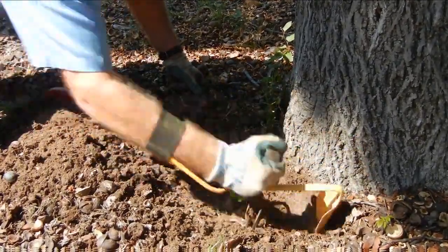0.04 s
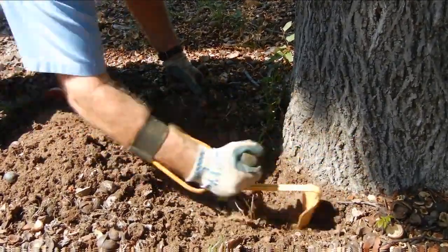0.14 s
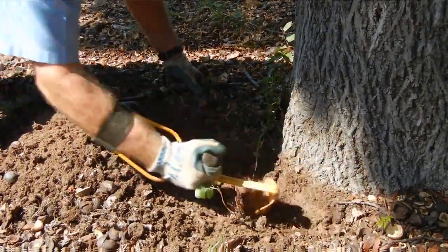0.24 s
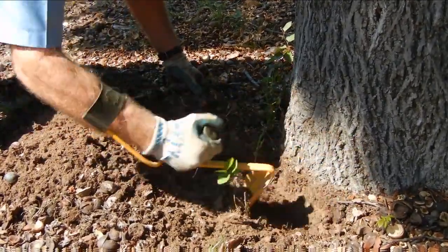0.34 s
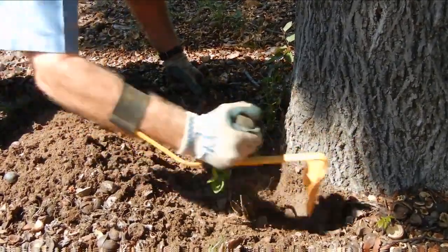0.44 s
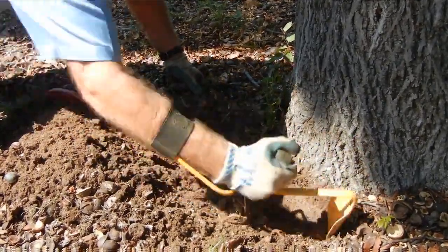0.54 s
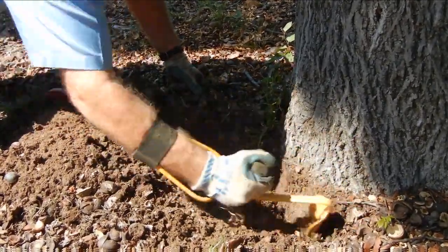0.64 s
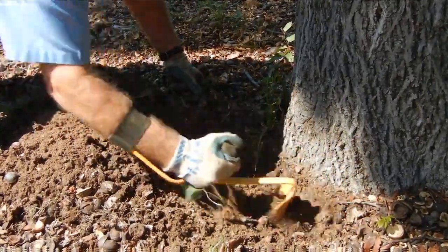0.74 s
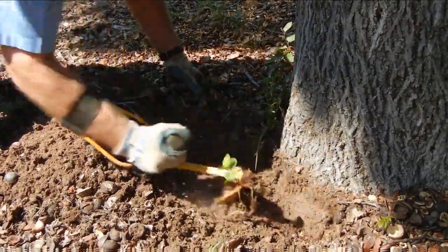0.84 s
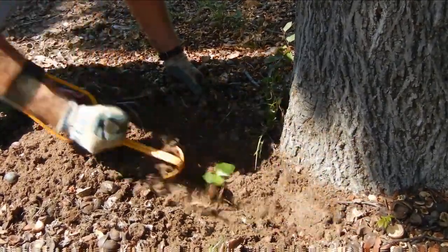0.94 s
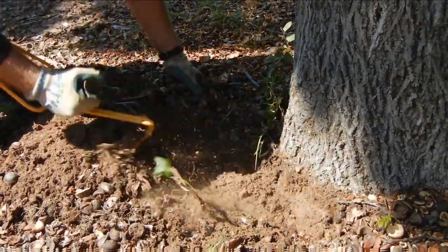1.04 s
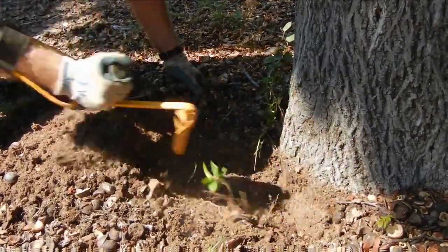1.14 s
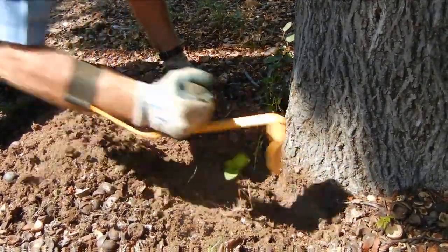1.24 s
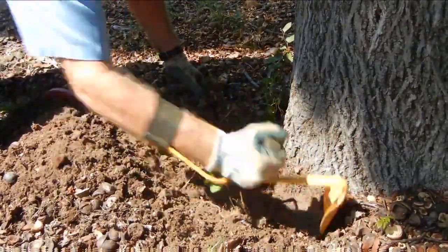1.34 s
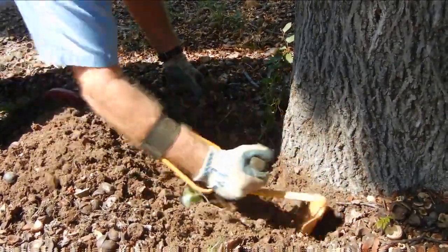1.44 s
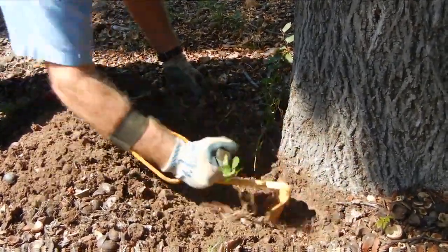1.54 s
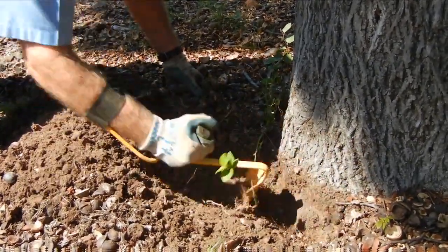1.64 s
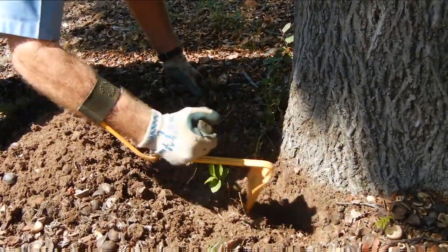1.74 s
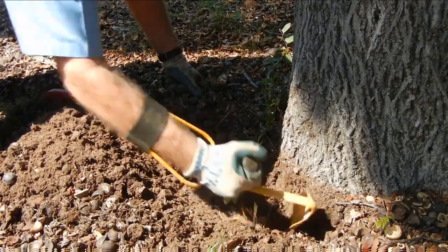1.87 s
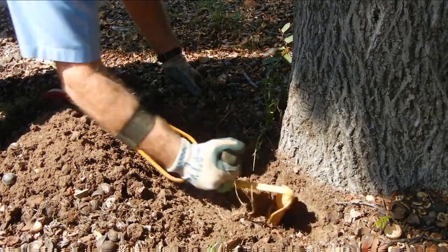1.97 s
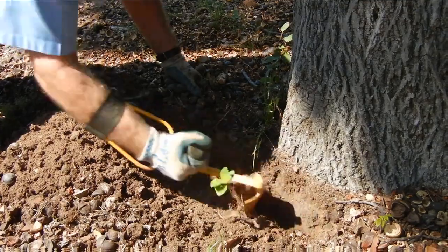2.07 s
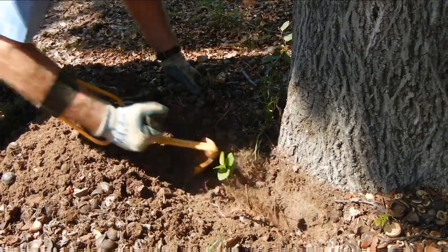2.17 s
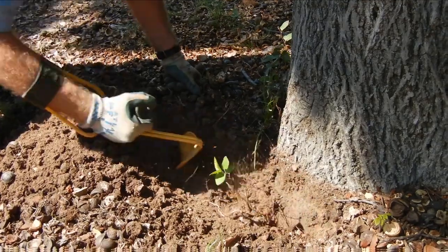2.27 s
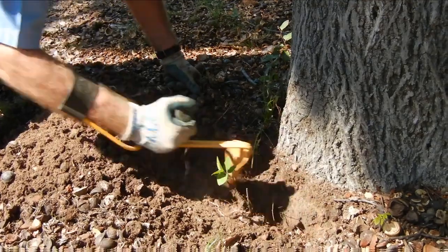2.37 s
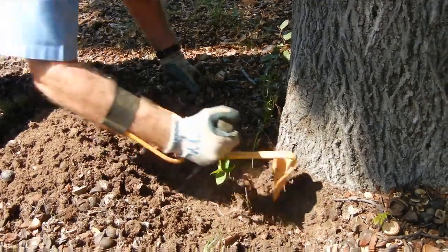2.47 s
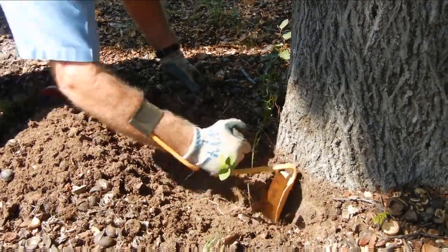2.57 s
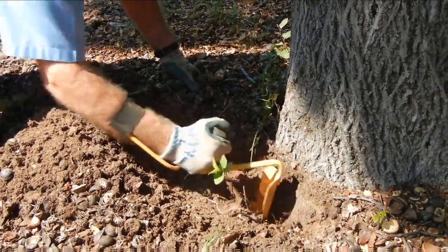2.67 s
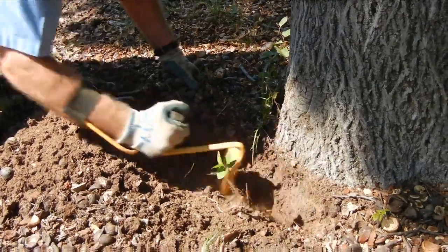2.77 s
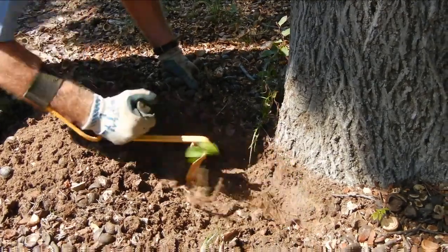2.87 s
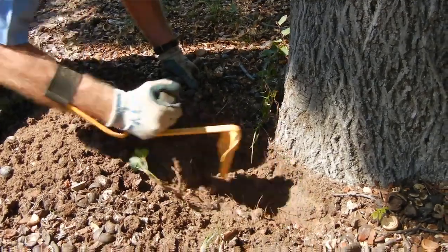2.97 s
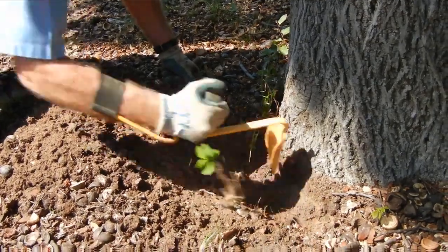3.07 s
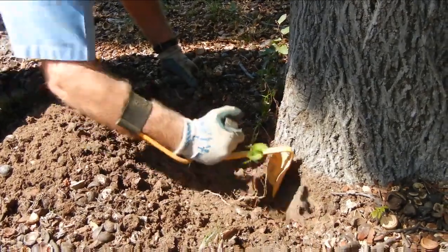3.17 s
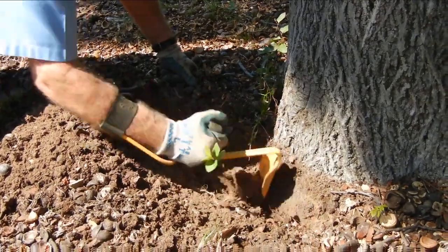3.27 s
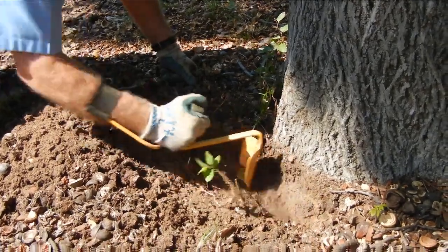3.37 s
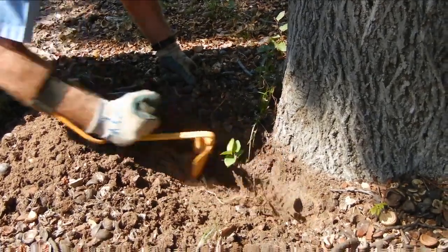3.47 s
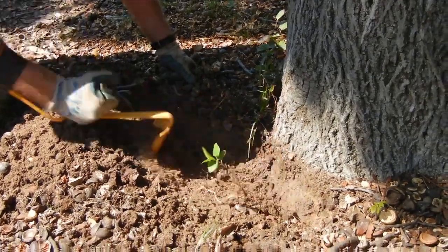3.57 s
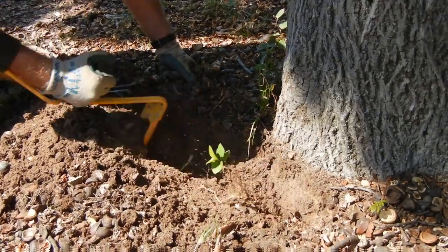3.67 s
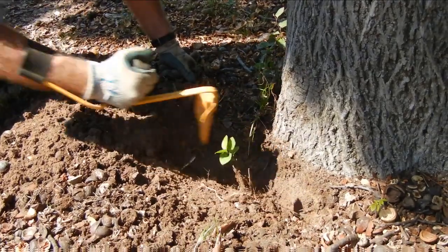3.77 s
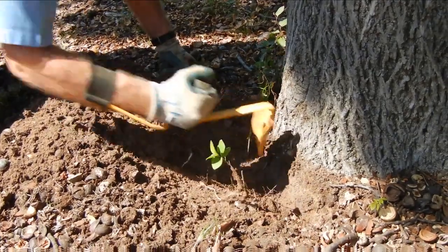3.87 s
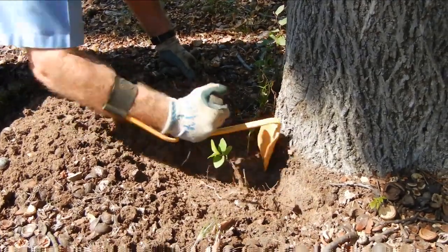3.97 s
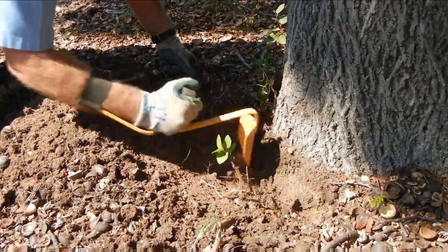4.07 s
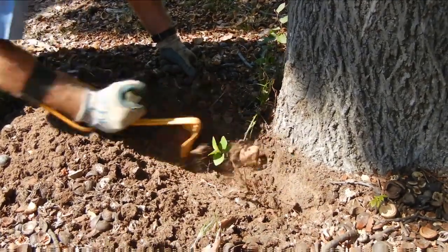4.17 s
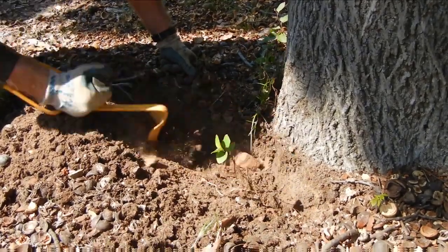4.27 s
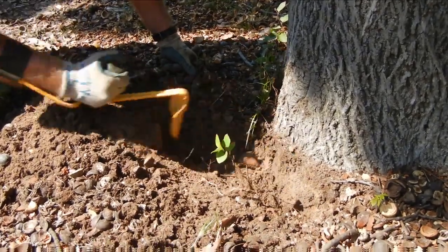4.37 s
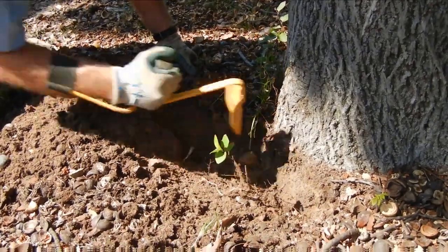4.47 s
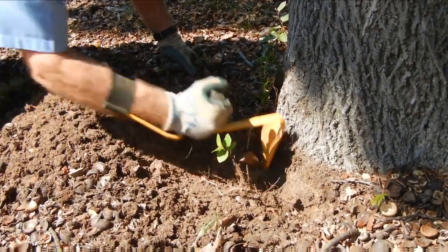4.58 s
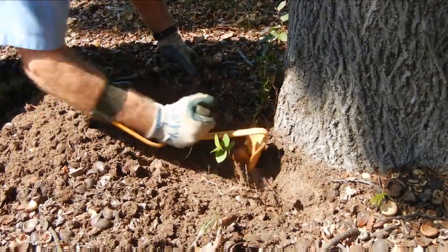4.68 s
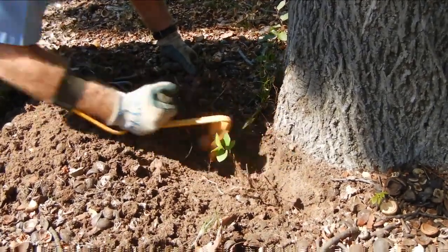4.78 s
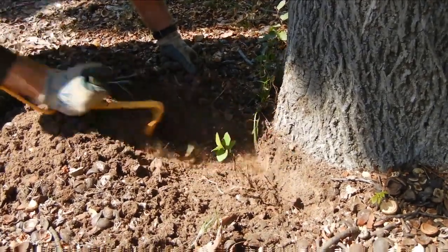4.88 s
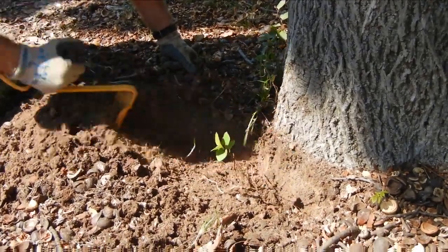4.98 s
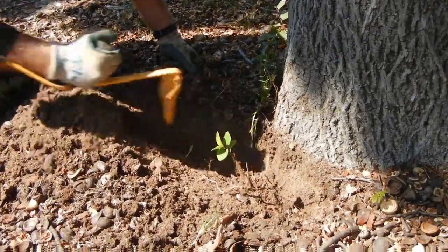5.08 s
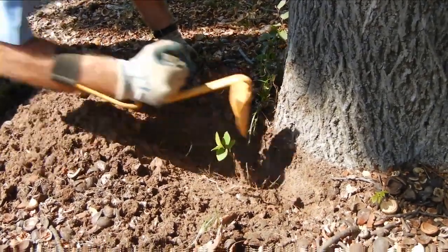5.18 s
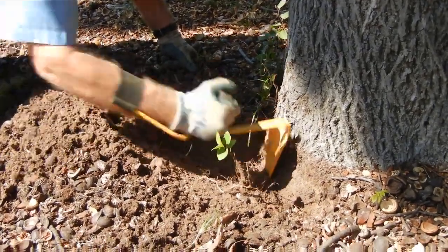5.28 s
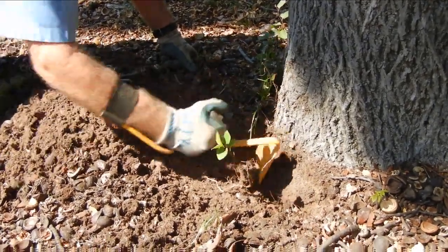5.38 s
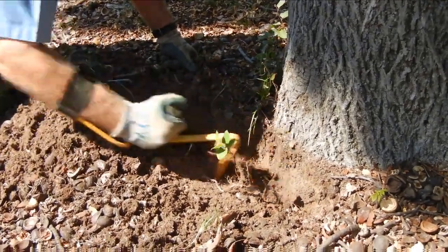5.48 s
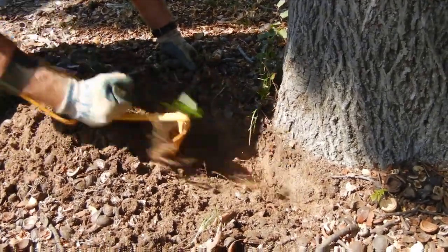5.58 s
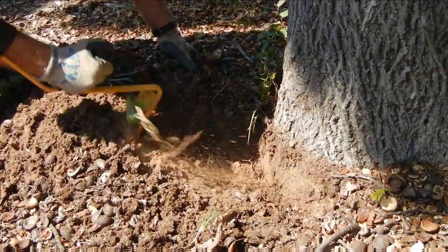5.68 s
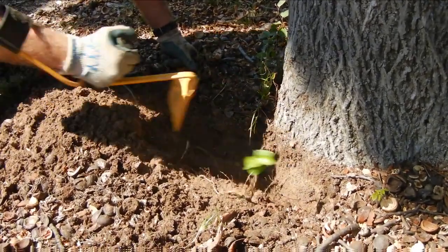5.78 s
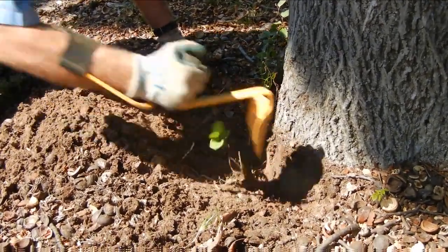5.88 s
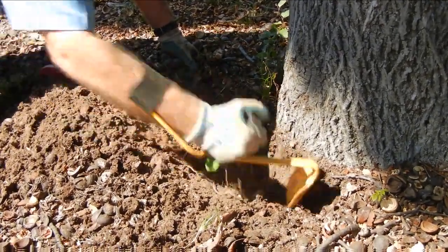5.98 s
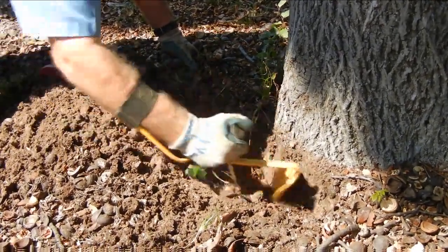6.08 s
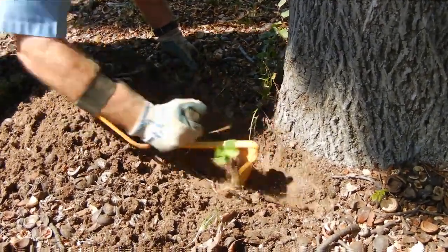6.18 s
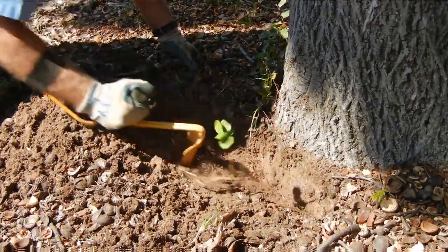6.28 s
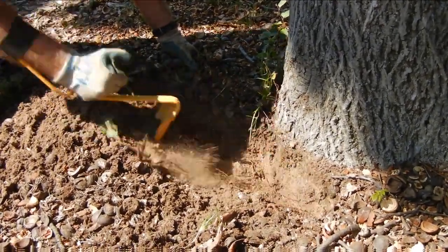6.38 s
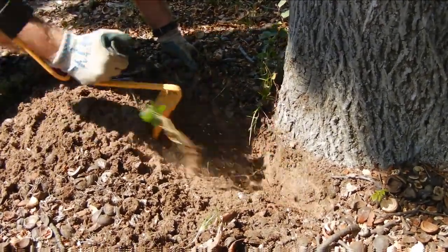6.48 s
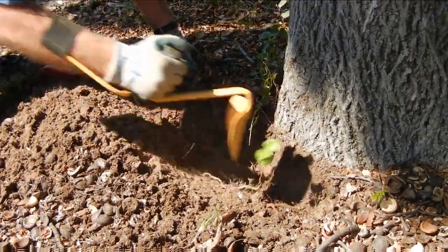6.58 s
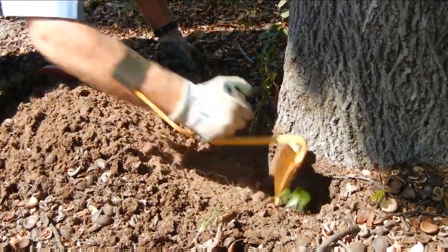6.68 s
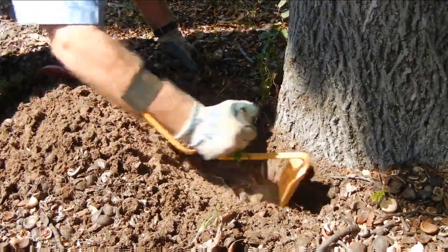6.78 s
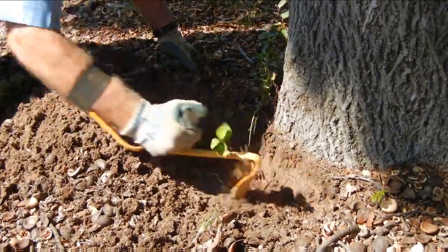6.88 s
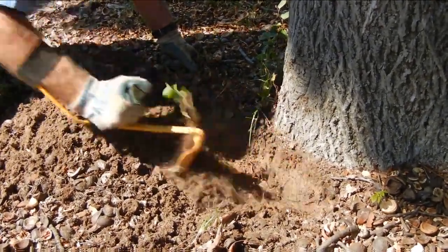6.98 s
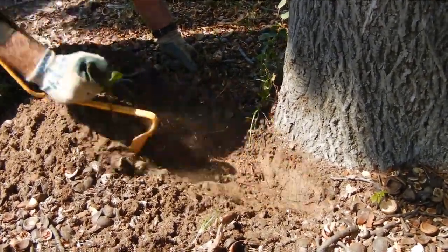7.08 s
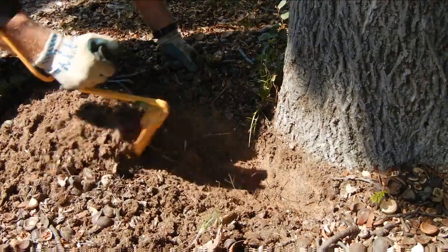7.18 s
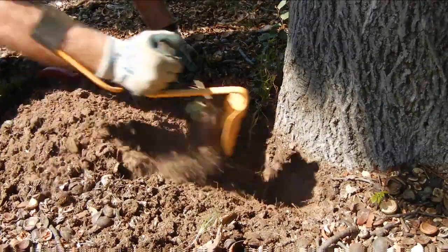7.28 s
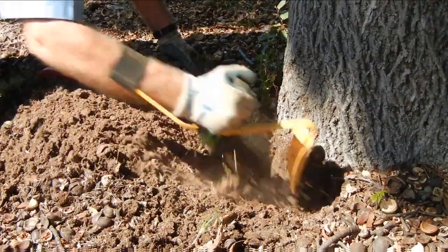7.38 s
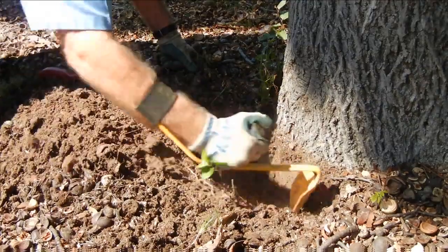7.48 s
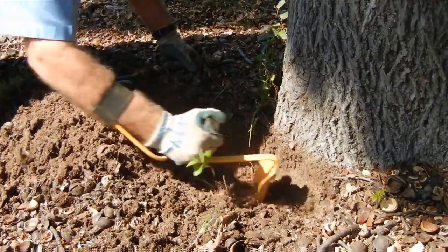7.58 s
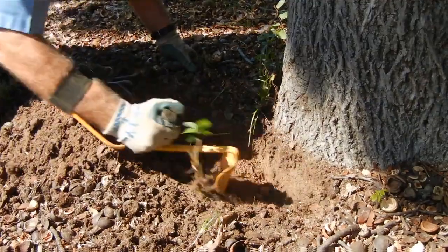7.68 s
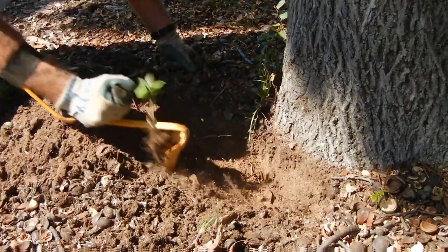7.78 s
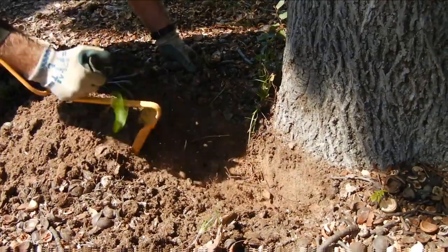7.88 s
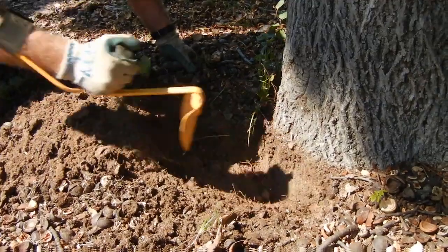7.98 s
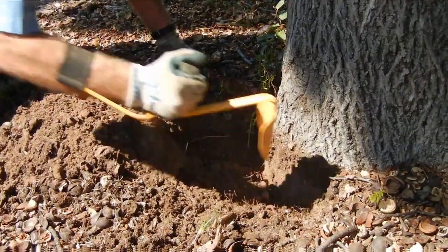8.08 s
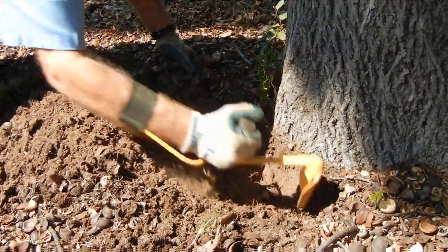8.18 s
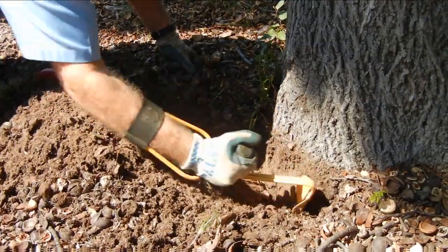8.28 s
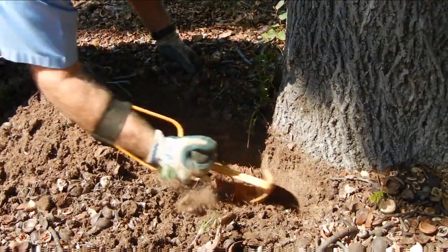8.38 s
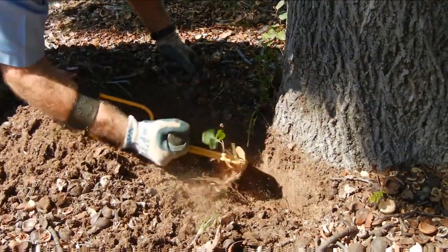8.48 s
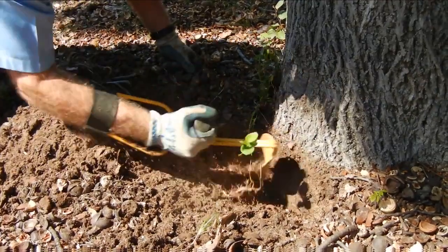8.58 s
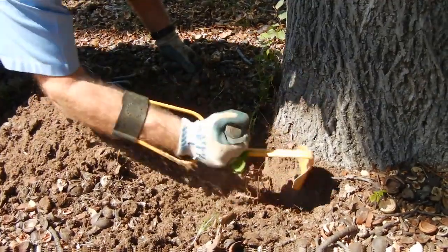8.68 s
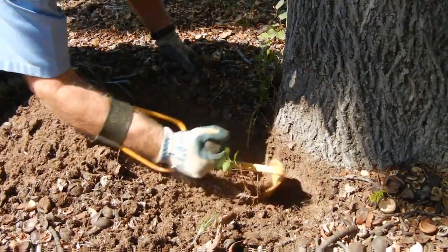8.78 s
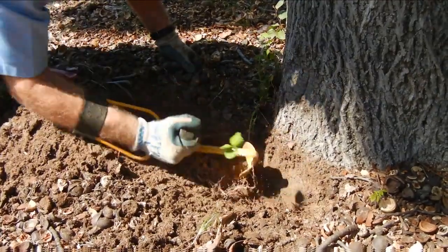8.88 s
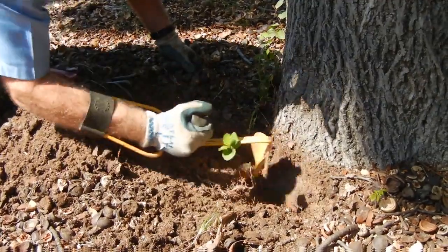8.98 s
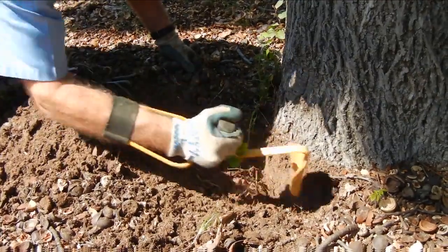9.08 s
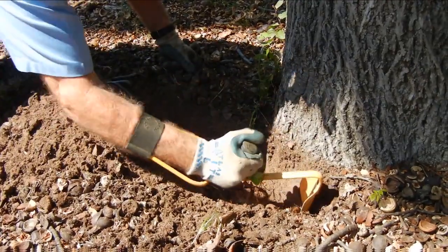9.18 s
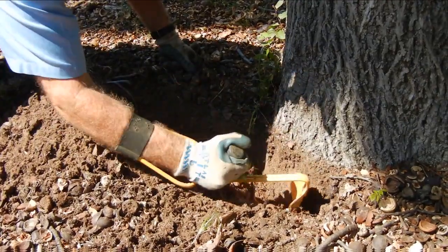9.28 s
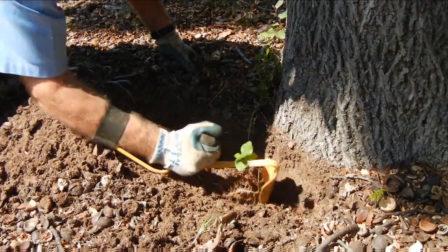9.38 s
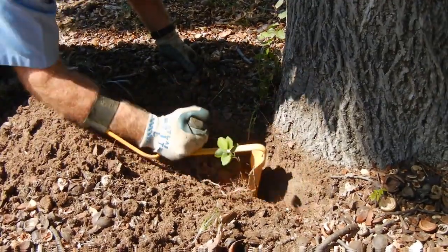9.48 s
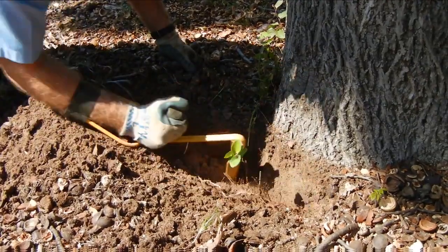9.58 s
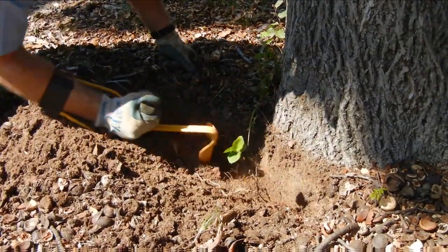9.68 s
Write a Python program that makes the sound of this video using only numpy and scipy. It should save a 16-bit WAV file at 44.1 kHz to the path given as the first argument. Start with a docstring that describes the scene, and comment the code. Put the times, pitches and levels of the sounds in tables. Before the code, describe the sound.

Close, crisp digging outdoors: a metal edge bites stony earth, clods crunch, and sandy soil is raked back in short, rough scrapes. Early strokes are bright and clacking, a few light metallic tings come in the middle, and several very hard stone snaps stand out before the scraping grows denser with dull ground thumps. Almost no echo, near-central wide-sounding grit, quiet wavering air underneath.

```python
"""A steel hand hoe chops into dry gravelly soil at the foot of a tree and drags it away, about twice a second.
Knocks and crunches are bursts of random fractures exciting resonances; dragging is a dense stream of such grains.
The blade is a bank of decaying modes, tapped in rings, rubbed in skids and heard through the grains.
Stones clack and packed ground thumps as single oscillators; the hole, trunk and ground scatter the sound.
The digging is heard close up in open air, over a quiet outdoor background of filtered noise."""
import sys
import numpy as np
from scipy import signal
from scipy.fft import rfft, irfft, next_fast_len
from scipy.io import wavfile
from scipy.ndimage import uniform_filter1d

SR = 44100
rng = np.random.default_rng(int(sys.argv[2]) if len(sys.argv) > 2 else 0)


def waveform_to_disk(signal):
    """Save audio, clipped to [-1, 1], as 16-bit WAV at the path in sys.argv[1]."""
    frames = np.transpose(np.atleast_2d(signal))
    scaled = np.clip(frames, -1, 1) * 32767
    samples = np.round(scaled).astype(np.int16)
    wavfile.write(sys.argv[1], SR, samples)


N = 429093
TIME = np.arange(N) / SR
BURST = TIME[:8192]  # time axis of one short event, s


def undb(db):
    """Logarithmic level: decibels to amplitude gain."""
    return 10 ** (np.asarray(db) / 20)


def unit(x, seconds):
    """Energy normalization: scale x to the energy of a unit-rms sound of that duration."""
    return x * np.sqrt(seconds * SR / (np.sum(x ** 2) + 1e-18))


def add(out, s, x):
    """Superposition: mix x into out at time s."""
    i = max(int(s * SR), 0)
    out[i:i + len(x)] += x[:max(len(out) - i, 0)]


def colour(x, points):
    """Minimum-phase filtering: a causal filter with the given (f/Hz, gain/dB) outline."""
    n = next_fast_len(len(x), real=True)
    n += n % 2
    hz, db = np.transpose(points)
    bins_hz = np.arange(n // 2 + 1) * SR / n
    gain_db = np.interp(np.log(bins_hz + 1), np.log(hz), db)
    cepstrum = irfft(np.log(undb(gain_db)))
    # folding the cepstrum onto positive times makes the filter causal
    cepstrum[1:n // 2] *= 2
    cepstrum[n // 2 + 1:] = 0
    return irfft(rfft(x, n) * np.exp(rfft(cepstrum)))[:len(x)]


def band(x, hz, q):
    """Simple resonance: a peak whose bandwidth is hz / q."""
    b, a = signal.iirpeak(min(hz, SR / 3), max(q, .5), fs=SR)
    return signal.lfilter(b, a, x)


def walk(rate):
    """Low-pass random process: a smooth wander with a spread near 1, taking rate steps a second."""
    k = int(SR / rate)
    steps = np.repeat(rng.standard_normal(N // k + 1), k)
    return unit(uniform_filter1d(steps, k)[:N], N / SR)


def grains(n, per_s, spread_db):
    """Random impulse process: tiny fractures at random moments, many small and a few large."""
    size = undb(spread_db * np.minimum(rng.exponential(size=n), 4))
    return (rng.random(n) < per_s / SR) * rng.choice([-1, 1], n) * size


def steady(x):
    """Envelope normalization: hold the slow level of a grain stream at 1 and keep its fast crackle."""
    return x / np.sqrt(uniform_filter1d(x ** 2, size=3500) + 1e-12)


def scatter(x, t60):
    """Diffuse reflection: convolution with noise that decays by 60 dB in t60 seconds."""
    echoes = rng.standard_normal(len(BURST)) * np.exp(-np.log(1000) * BURST / t60)
    return signal.fftconvolve(x, unit(echoes, 1 / SR))[:N]


# outline of the outdoor background: (f/Hz, relative gain/dB)
AIR_OUTLINE = [(15, -33), (25, -9), (107, 3), (246, -3.5), (389, -13.5), (523, -9.5), (1270, -10.5),
               (1620, -8.5), (3000, -15), (4380, -25), (15500, -30.5)]
AIR_DB = -41.5


def air():
    """Filtered noise: a soft wavering background, alike in both channels in the lowest rumble, under a wide hiss."""
    mid, side = (unit(colour(rng.standard_normal(N), AIR_OUTLINE), N / SR) for _ in range(2))
    # the channels differ more and more towards the treble
    side = colour(side, [(30, -17), (150, -6.5), (2500, -6.0), (6000, -1.0)])
    both = mid + side * np.array([[1], [-1]])
    low = signal.sosfilt(signal.butter(1, 3000, fs=SR, output="sos"), both)
    hiss = both - low
    return undb(AIR_DB) * (undb(walk(3.7)) * low + hiss)


# modes of the blade: (f/Hz, level/dB, t60 at a damping of 1/s)
BLADE_MODES = [(445, -5, .08), (850, -4.5, .11), (1620, -15, .08), (2730, -9.5, .08), (2245, -1, .105),
               (2972, -8.5, .2), (4086, -9.5, .11), (5830, -15, .13), (6358, -5, .06), (8300, -6, .04),
               (10650, -8, .045), (13350, -11, .045)]
SOIL_DETUNE = 0.01  # random spread of each mode, as a share of its pitch, per unit of damping above 1


def blade(damping, hz=None):
    """Modal superposition: a tap's response, damped and detuned by soil; contact favours modes around hz."""
    f, db, t60 = np.transpose(BLADE_MODES)[:, :, None]
    f = f * (1 + SOIL_DETUNE * np.clip(damping - 1, 0, 2) * rng.standard_normal(f.shape))
    weight = 1 if hz is None else 1 / (1 + (2.4 * np.log2(f / hz)) ** 2)
    decay = np.exp(-np.log(1000) * BURST * damping / t60)
    return np.sum(weight * undb(db) * np.sin(2 * np.pi * f * BURST) * decay, axis=0)


def through_blade(x, steel_db, damping):
    """Two transmission paths: grains are heard directly and through the half-buried steel."""
    response = unit(blade(damping), 1 / SR)
    return x + undb(steel_db) * signal.fftconvolve(x, response)[:len(x)]


# outline of fine grit: (f/Hz, relative gain/dB)
GRIT_OUTLINE = [(1500, -19), (4000, 2.5), (5800, 3), (7200, 0), (10500, -0.5), (14000, -0.5), (16000, -15)]
# outline of the ground's thud: (f/Hz, relative gain/dB)
THUD_OUTLINE = [(35, -21), (128, 3.5), (175, -4), (260, -8), (600, 3), (2500, -102)]


def fracture(force, length, db, hz, grit_db, thud_db, steel_db):
    """Impulsive excitation of resonators: breaking grains ring stones, spit sand and push the ground."""
    cracks = through_blade(force * grains(len(force), 20000, 5.0), steel_db, damping=1.92)
    stones = sum(band(cracks, hz * 2 ** (octaves + rng.normal(0, 0.175)), q=25)
                 for octaves in np.linspace(-.55, .55, num=4))
    body = colour(band(cracks + 0.87 * stones, hz, q=0.82), [(3600, -2.0), (7000, -27.5)])
    # every small stone has a high pitch of its own
    chips_hz = np.geomspace(4000, 14000, num=7) * 2 ** rng.normal(0, 0.184, size=7)
    chips = sum(band(cracks, chip_hz, q=60) for chip_hz in chips_hz)
    grit = colour(cracks + 1.37 * chips, GRIT_OUTLINE)
    # the packed ground gives one or two slow swings
    push = np.minimum(force, .6) * (1 + 4 * rng.standard_normal(len(force)))
    thud = colour(band(push, 203, q=2.3), THUD_OUTLINE)
    return undb(db) * unit(body, length) + undb(grit_db) * unit(grit, length) + undb(thud_db) * unit(thud, length)


# the blade bites or a stone snaps past it; levels are those before the pit:
# (t/s, nominal length/s, level/dB, centre f/Hz, ground thud level/dB)
KNOCK_EVENTS = [(0.127, 0.008, -9.5, 2470, -32), (0.238, 0.0027, -19.5, 1580, -33),
                (0.263, 0.015, -23, 1590, -27.5), (0.315, 0.0034, -24.5, 1060, -22.5),
                (0.6084, 0.0067, -16, 2740, -22.5), (0.878, 0.0077, -26, 1970, -31),
                (0.94, 0.0025, -25, 1370, -38), (0.962, .003, -24, 1060, -40),
                (1.015, 0.0026, -14.5, 1560, -20), (1.042, 0.011, -21, 1900, -20),
                (1.457, 0.011, -12.5, 3100, -29), (1.632, 0.0038, -22.5, 1045, -38),
                (1.998, 0.012, -25, 1400, -21.5), (2.111, 0.0031, -17.5, 1450, -20),
                (2.169, 0.0089, -28, 885, -28), (2.199, 0.0055, -26, 1580, -27),
                (2.234, .002, -30, 2420, -34), (2.837, 0.0038, -19, 1570, -38),
                (2.879, 0.001, -16, 1500, -40), (2.901, 0.0038, -23, 1620, -23),
                (3.233, 0.012, -18, 1420, -27.5), (3.458, 0.0021, -2.5, 2270, -14.5),
                (3.65, 0.0044, -8.5, 1007, -16.5), (4.114, 0.002, -17, 1900, -45),
                (4.191, 0.0078, -18.5, 2120, -47), (4.753, 0.0016, -9.5, 1680, -50),
                (4.766, 0.0017, -16, 1500, -52), (4.78, 0.0026, -18.5, 1900, -56),
                (4.866, 0.0025, -24, 1340, -47), (4.905, 0.0006, -3, 1710, -36),
                (4.913, 0.01, -15, 2070, -33), (5.006, 0.0015, -23.5, 1680, -30),
                (5.101, .002, -17.5, 1580, -45), (5.386, 0.01, -20.5, 1300, -23.5),
                (5.595, 0.00047, -0.5, 1460, -12), (6.088, 0.005, -24, 3130, -25),
                (6.218, 0.0065, -15.5, 1170, -22.5), (6.232, 0.001, -10, 1350, -35),
                (6.237, 0.0042, -8.5, 1500, -23), (6.357, 0.0079, -21.5, 1580, -24.5),
                (6.375, 0.0051, -21, 2420, -23), (6.823, 0.008, -14, 1830, -35),
                (6.94, 0.0019, -13.5, 2300, -19), (7.07, 0.0086, -12, 1060, -10),
                (7.168, 0.0044, -25, 2210, -42), (7.561, 0.0043, -21, 2090, -34),
                (7.59, 0.0015, -17, 1310, -50), (7.634, 0.01, -21.5, 1880, -37),
                (7.67, 0.0038, -13, 2170, -33), (7.773, 0.0032, -22.5, 1220, -48),
                (7.858, 0.0084, -10, 452, -36), (8.404, 0.0076, -24.5, 1900, -29),
                (8.536, 0.0042, -16, 1870, -29), (8.85, 0.0059, -27, 2300, -43),
                (8.884, 0.01, -18.5, 1970, -34), (8.944, 0.0053, -21, 1400, -42),
                (9.688, 0.0037, -17.5, 1820, -29)]
# a brighter knock throws more sand: grit against the knock's level, at a reference centre pitch
SPRAY_DB, SPRAY_HZ, SPRAY_DB_PER_OCTAVE = -11, 1740, 14


def knocks():
    """Impact: the edge scuffs the loose top layer, then strikes; the blow dies exponentially, trailing crumbs."""
    out = np.zeros(N)
    lead = .02  # s of scuffing room before the blow
    after, before = np.maximum(BURST - lead, 0), np.maximum(lead - BURST, 0)
    for s, length, db, hz, thud_db in KNOCK_EVENTS:
        grit_db = db + SPRAY_DB + SPRAY_DB_PER_OCTAVE * np.log2(hz / SPRAY_HZ)
        blow = (1 - np.exp(-after / 0.00077)) * np.exp(-after / (0.81 * length))
        loose = undb(-27.5) * np.exp(-before / 0.00071 - after / 0.0019)
        add(out, s - lead, fracture(blow + loose, length, db, hz, grit_db, thud_db, steel_db=-13.5))
    return out


# the edge lands hard on a buried stone, which clacks at its own pitch:
# (t/s, level of the decay before its build-up/dB, f/Hz)
CLACK_EVENTS = [(0.128, -2.5, 1894), (0.131, 1, 4220), (0.613, -4.5, 2680), (1.458, -5.5, 2750),
                (3.4585, 0.5, 2314), (3.641, -7, 844), (4.196, -10, 1900), (6.237, -3, 1187),
                (6.441, -7.5, 1254), (7.073, -10, 874)]
CLACK_CYCLES = 7.6  # swings until the clack has fallen to 1 / e
CONTACT_S = 0.00024  # time constant of a clack's or ring's build-up while edge and stone touch


def clacks():
    """Damped oscillator: a stone pinned between edge and ground sounds one short, hard note."""
    out = np.zeros(N)
    for s, db, hz in CLACK_EVENTS:
        envelope = (1 - np.exp(-BURST / CONTACT_S)) * np.exp(-BURST * hz / CLACK_CYCLES)
        add(out, s, undb(db) * envelope * np.sin(2 * np.pi * hz * BURST))
    return out


# one pull of the blade through loose soil; levels are those at full load, before the pit:
# (t/s, length/s, coarse soil level/dB, fine grit level/dB, build-up of load/dB, run-out/s)
PULL_EVENTS = [(0.151, 0.21, -32, -38.5, 8.5, 0.19), (0.619, 0.47, -36, -44.5, -1, 0.23),
               (1.475, 0.094, -27, -37.5, 22, 0.78), (2.038, 0.26, -35, -44.5, 0.5, 0.4),
               (2.731, 0.14, -28, -35, 13.5, 0.29), (3.277, 0.29, -33, -42.5, 10.5, 0.24),
               (4.096, 0.18, -37.5, -43, -0.5, 0.36), (4.764, 0.14, -27, -37.5, 8.5, 0.41),
               (5.453, 0.27, -30, -36.5, 9, 0.14), (6.096, 0.39, -36, -41.5, -0.5, 0.13),
               (6.763, 0.4, -31, -37, 3.5, 0.61), (7.498, 0.17, -27.5, -37, 14, 0.31),
               (7.725, 0.19, -30, -37.5, 9.5, 0.57), (8.402, 0.12, -22.5, -32.5, 10, 0.26),
               (8.85, 0.081, -27.5, -37, 0, 0.27), (9.334, 0.15, -30, -39.5, 8.5, 0.26),
               (9.595, 0.11, -35.5, -44, 1, 0.22)]
ENTRY_S = 0.015  # the blade sinks in
RUN_OUT_DB = 58.5  # the stream dies by this much over a pull's run-out


def pull_levels():
    """Load-dependent friction: a pull sinks in, its load changes, then it runs out; gains of soil and grit."""
    gains = np.zeros((2, N))
    for s, length, soil_db, grit_db, build_db, run_out in PULL_EVENTS:
        age = TIME - s
        entry = np.clip(age / ENTRY_S, 0, 1)
        # the load usually grows as soil heaps before the blade
        load_db = build_db * (np.clip(age / length, 0, 1) - 1)
        fade_db = RUN_OUT_DB * np.maximum(age - length, 0) / run_out
        gains += undb([[soil_db], [grit_db]]) * entry * undb(load_db - fade_db)
    return gains


# outline of coarse soil: (f/Hz, relative gain/dB)
SOIL_OUTLINE = [(50, -17.5), (150, 14), (310, 0), (450, -1), (900, 3.5), (1500, -3.5), (2500, -0.5),
                (3400, -7), (5000, -14.5), (9000, -47)]


def drag():
    """Stick-slip friction: crumbs burst densely before the blade and sand rubs along the steel."""
    soil, grit = pull_levels()
    # many small catches overlap, each letting go at once
    catches = signal.fftconvolve(np.abs(grains(N, 160, 2.6)), np.exp(-BURST / 0.0016))[:N]
    slip = undb(3 * walk(70) + 2.6 * walk(260)) + .7 * unit(catches, N / SR)
    # crumbs of every size burst at their own pitch
    crumbs = sum(unit(band(grains(N, 150, 4.3), hz, q=3), hz) for hz in np.geomspace(300, 12000, num=16))
    crumbs = unit(crumbs, N / SR)
    sand = unit(grains(N, 7000, 2.7), N / SR)
    rubble = slip * (crumbs + 0.59 * sand)
    rub = slip * (sand + crumbs)
    # the buried steel is heavily damped; the point of contact wanders along the edge and picks out different modes
    contacts = [signal.fftconvolve(rub, unit(blade(9, hz), 1 / SR))[:N]
                for hz in np.geomspace(1600, 9500, num=4)]
    steel = undb(-32.5) * sum(undb(6.3 * walk(4.8)) * contact for contact in contacts)
    coarse = steady(colour(rubble + steel, SOIL_OUTLINE))
    fine = steady(colour(rub + steel, GRIT_OUTLINE))
    return coarse * soil + fine * grit


# a clod is crushed, swelling and fading; levels are those before the pit:
# (t at its height/s, nominal length/s, level/dB, centre f/Hz, grit level/dB, ground thud level/dB)
CRUNCH_EVENTS = [(0.361, 0.012, -30, 1680, -32.5, -32.5), (0.743, 0.024, -27, 2380, -30, -31.5),
                 (1.03, 0.0072, -17, 1470, -21, -20), (2.644, 0.015, -26.5, 1590, -35, -32),
                 (3.639, 0.0073, -5.5, 1370, -12, -18), (3.681, 0.019, -29.5, 2330, -30.5, -38),
                 (4.02, 0.018, -37.5, 2120, -45, -59), (4.128, 0.027, -22.5, 1760, -29.5, -53),
                 (4.153, 0.012, -17, 1430, -24, -26), (4.692, 0.011, -25.5, 800, -40.5, -60),
                 (5.691, 0.009, -8, 1100, -18, -25), (5.763, 0.0082, -28.5, 2570, -35, -38),
                 (6.1, 0.014, -20.5, 3560, -24.5, -29.5), (6.189, 0.025, -27.5, 2260, -33.5, -32),
                 (6.307, 0.011, -26, 1580, -25.5, -24.5), (6.445, .013, -11.5, 1333, -18, -24),
                 (6.813, 0.021, -25.5, 2190, -27.5, -30.5), (6.906, 0.018, -16.5, 2510, -25, -49),
                 (6.974, 0.018, -23.5, 1750, -34.5, -25), (7.064, 0.013, -14.5, 2380, -22, -20),
                 (7.866, 0.011, -9.5, 870, -18.5, -15), (8.315, 0.015, -23.5, 2570, -26, -29.5),
                 (8.471, 0.019, -21.5, 1810, -28.5, -29), (9.257, 0.015, -31.5, 1780, -32.5, -29.5),
                 (9.667, 0.015, -22.5, 1950, -29.5, -32)]


def crunches():
    """Brittle failure: pressure builds in a clod until it collapses."""
    out = np.zeros(N)
    for s, length, *tone in CRUNCH_EVENTS:
        lead = 2 * length
        force = 1 / np.cosh(np.minimum(np.abs(BURST - lead) / (0.46 * length), 20))
        add(out, s - lead, fracture(force, length, *tone, steel_db=-12))
    return out


# the edge skids over a stone and sings:
# (t at its height/s, nominal length/s, level/dB, centre of the excited modes f/Hz,
#  speed of the ring's decay, 1 = the times in BLADE_MODES, below 1 rings longer)
SKID_EVENTS = [(1.806, 0.062, -37, 3060, 0.97), (1.817, 0.012, -35.5, 6550, 0.54),
               (2.431, 0.02, -25, 2680, 1.6), (6.179, 0.019, -29, 3060, 2.2),
               (9.453, 0.059, -33, 2760, 2.7)]
SKID_HISS_DB = -8  # dry friction against the singing steel


def skids():
    """Frictional excitation of modes: tiny slips bow the blade, swelling and fading, and leave it ringing."""
    out = np.zeros(N)
    lead = len(BURST) / SR / 2
    for s, length, db, hz, damping in SKID_EVENTS:
        slips = grains(len(BURST), 10000, 2.8) / np.cosh((BURST - lead) / (0.45 * length))
        steel = signal.fftconvolve(slips, blade(damping, hz))
        hiss = band(slips, hz, q=0.25)
        add(out, s - lead, undb(db) * unit(steel, length))
        add(out, s - lead, undb(db + SKID_HISS_DB) * unit(hiss, length))
    return out


# the blade rings: (t/s, level/dB, centre of the excited modes f/Hz,
#  speed of the ring's decay, 1 = the times in BLADE_MODES, below 1 rings longer)
RING_EVENTS = [(2.288, -35, 2040, 1.5), (2.389, -26, 2050, 0.78), (2.4205, -24.5, 2770, 1),
               (2.436, -34, 5700, 1.07), (4.196, -18.5, 2120, 2.7), (5.1, -31, 2820, 0.8),
               (5.69, -18, 2020, 5.5), (6.444, -18.5, 1980, 2.2), (7.259, -34.5, 3280, 1.24),
               (7.35, -43, 4370, 0.97)]


def rings():
    """Free vibration: a stone flicks the blade, giving a tick and a ring, shorter when soil holds the steel."""
    out = np.zeros(N)
    for s, db, hz, damping in RING_EVENTS:
        tick = band(rng.standard_normal(len(BURST)) * np.exp(-BURST / 0.0031), hz, q=0.18)
        ring = blade(damping, hz) * (1 - np.exp(-BURST / CONTACT_S))
        add(out, s, undb(db) * (unit(ring, 0.068) + unit(tick, 0.0018)))
    return out


# the packed ground gives under a heavy blow, a few round swings: (t at its height/s, peak level/dB, f/Hz)
THUMP_EVENTS = [(6.09, -12.5, 139), (6.809, -18.5, 158), (6.829, -14.5, 146), (6.977, -18.5, 175),
                (8.32, -17, 184)]
THUMP_CYCLES = 0.51  # swings over which a thump swells, and again fades


def thumps():
    """Elastic rebound: the soil under the blade is pressed down and springs back."""
    out = np.zeros(N)
    lead = len(BURST) / SR / 2
    for s, db, hz in THUMP_EVENTS:
        cycles = (BURST - lead) * hz
        add(out, s - lead, undb(db) * np.cos(2 * np.pi * cycles) / np.cosh(cycles / THUMP_CYCLES))
    return out


PIT_DB = -6  # reflections from the walls of the hole


def pit(x):
    """Early reflection: the hole returns the crackle within milliseconds, its colour drifting at random."""
    walls = sum(walk(9) * scatter(x, t60=0.016) for _ in range(3)) / np.sqrt(3)
    return undb(-1) * x + undb(PIT_DB) * colour(walls, [(500, -14), (2000, 0)])


# outline of the difference between the two channels: (f/Hz, gain/dB)
WIDTH_OUTLINE = [(100, -10), (2200, -19.5), (5000, -10), (13000, -3.5)]


def scene():
    """Superposition of sources: digging just right of centre; trunk and ground scatter a little of it back."""
    dig = pit(knocks() + crunches() + drag()) + thumps() + clacks() + rings() + skids()
    # grains fly to either side, so the paths to the two channels keep changing
    paths = sum(walk(300) * scatter(dig, t60=0.021) for _ in range(2)) / 2
    side = colour(paths, WIDTH_OUTLINE)
    surroundings = np.array([scatter(dig, t60=0.69) for _ in range(2)])
    direct = np.array([dig + side, undb(1.0) * dig - side])
    return direct + undb(-32.5) * surroundings + air()


TOP_HZ = 16000  # upper edge of the passband


def record(dry):
    """Saturation and band limiting: the highest peaks are rounded and the top is cut."""
    rounded = dry / (1 + dry ** 6) ** (1 / 6)
    return signal.sosfilt(signal.ellip(10, .2, 70, TOP_HZ, fs=SR, output="sos"), rounded)


dry = scene()
out = record(dry)
waveform_to_disk(out)
```